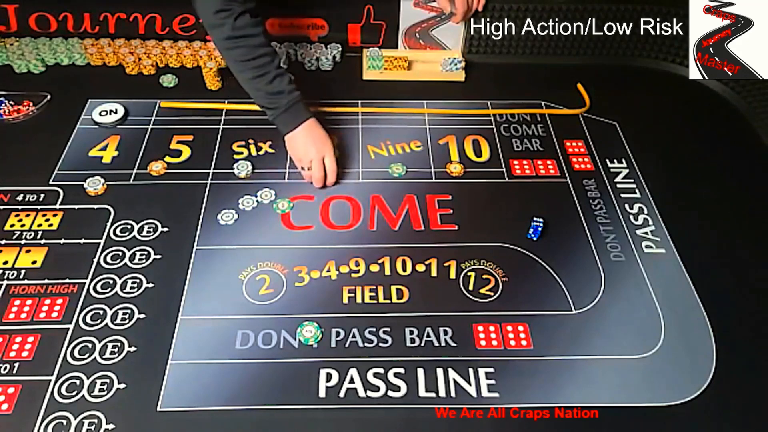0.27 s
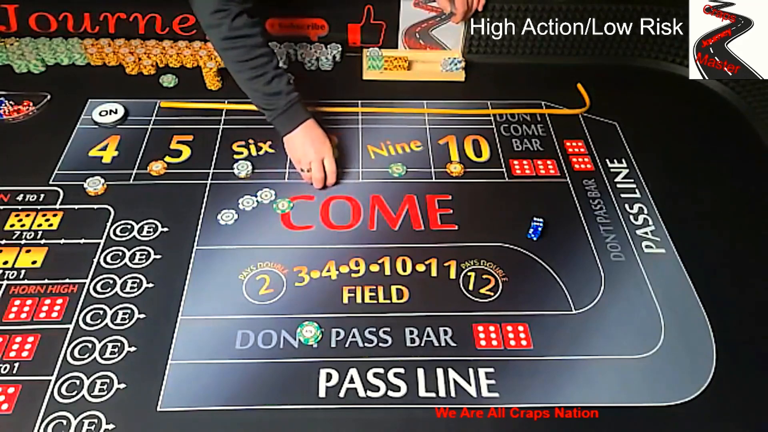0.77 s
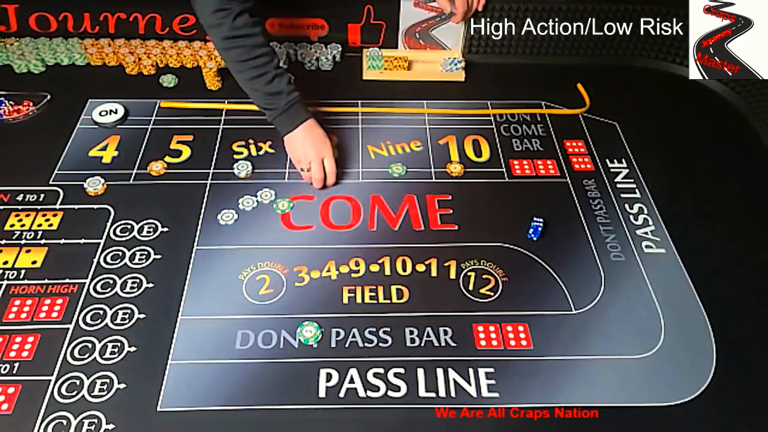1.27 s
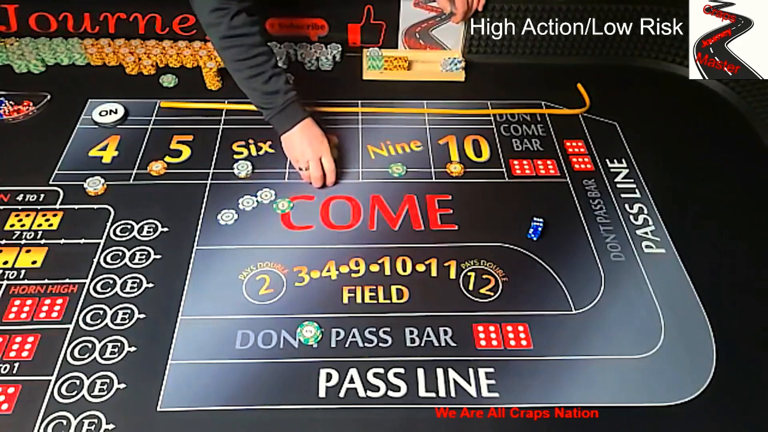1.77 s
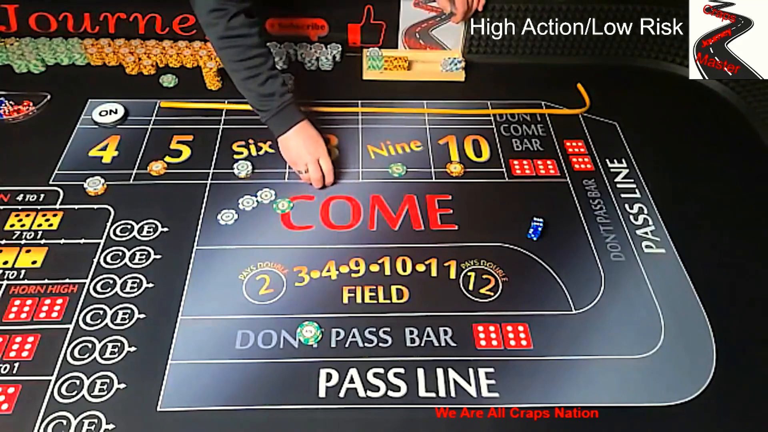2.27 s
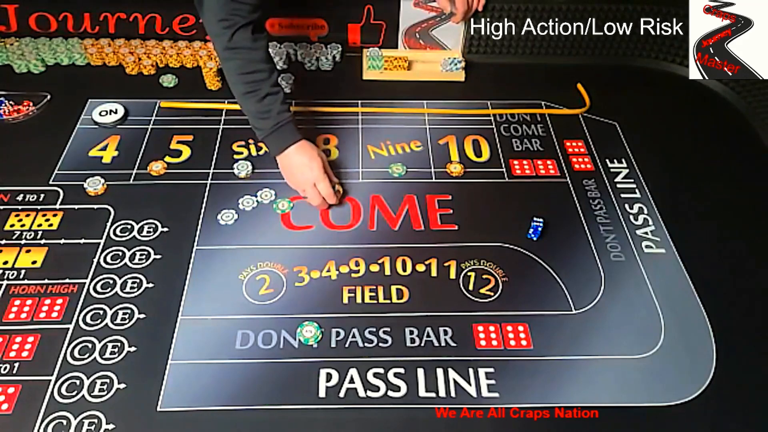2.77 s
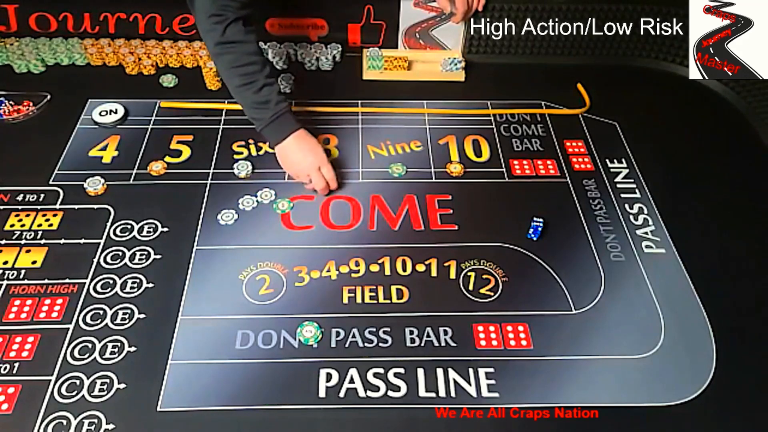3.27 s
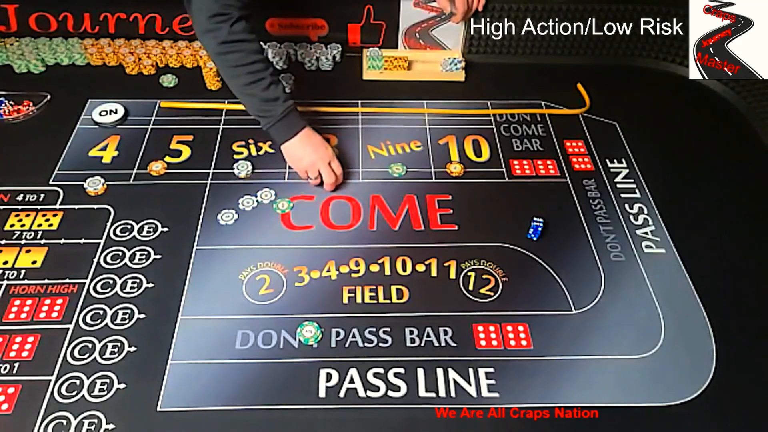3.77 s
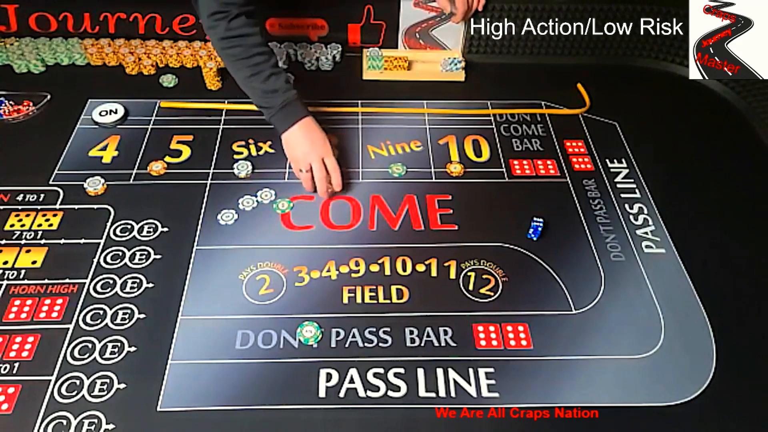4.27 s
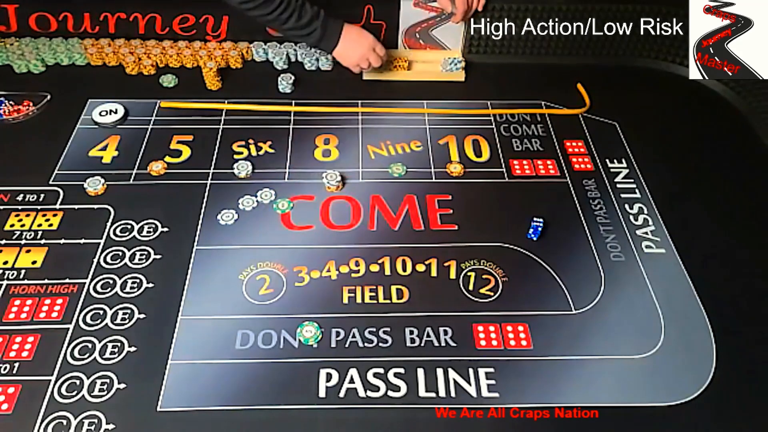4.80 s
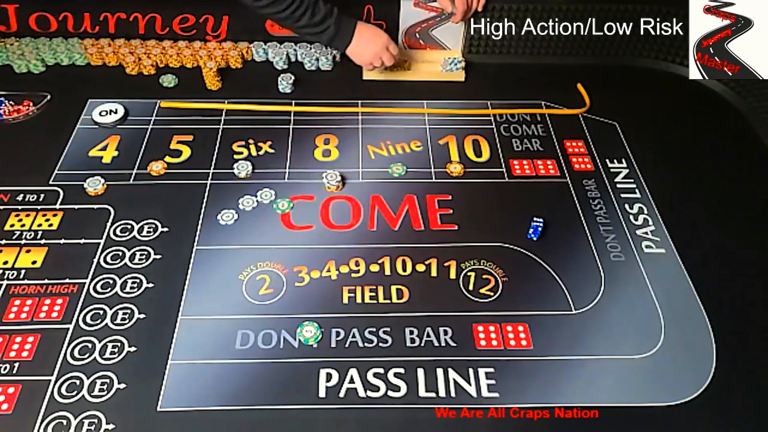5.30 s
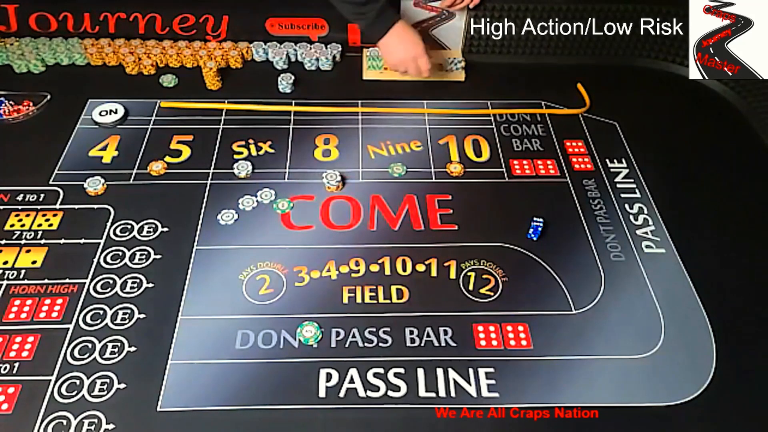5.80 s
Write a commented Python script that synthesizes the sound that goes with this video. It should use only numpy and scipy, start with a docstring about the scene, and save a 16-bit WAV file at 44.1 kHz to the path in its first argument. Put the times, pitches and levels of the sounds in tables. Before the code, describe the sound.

A clay casino chip click just catches the opening. A hand gives a soft, dull bump on a padded felt table, and a sleeve rustles faintly. Then chips clack together in one quick, bright cluster, the loudest sound, followed by a few much softer clicks and light scuffs on the felt. The microphone is close, in a small room, with only faint hiss and low hum in the gaps.

```python
"""A hand bumps a felt table and a sleeve rustles, then clay gaming chips click together, bright and close. (The
tail of an earlier click just catches the opening.) Each click is a short ring over a knock of the stack and
table; most rings are two chip faces meeting, but the lower one at 3.22 s is the knock of the stack ringing out.
The echo in the small room is held briefly and then cut short. Softer clicks and scuffs on the felt follow. In
between there is only hiss, a faint high whine and a low hum that comes up around the louder sounds."""
import sys
import numpy as np
from scipy import signal
from scipy.fft import rfft, irfft
from scipy.io import wavfile
from scipy.ndimage import uniform_filter1d

SR = 44100
rng = np.random.default_rng(int(sys.argv[2]) if len(sys.argv) > 2 else 0)


def generate_wav(sig):
    """Save sig (samples, or channels by samples) to the path in sys.argv[1] as 16-bit PCM at SR."""
    pcm = np.round(np.clip(np.atleast_2d(sig).T, -1, 1) * 32767).astype(np.int16)
    wavfile.write(sys.argv[1], SR, pcm)


N = 266584

# chip meets chip (the 3.22 s row's 2851 Hz ring is the stack and table's knock tone): start_s, ring_db,
# ring_pitch_hz, ring_length_s, knock_db, knock_tilt_db_per_oct, echo_db
CHIP_CLICKS = [(-.049, -10, 5730, 0.00096, -6, -1.5, 0.5), (3.2014, -0.2, 6310, 0.0026, -26, 6.5, -4),
               (3.2045, -0.5, 6290, 0.0029, -22.5, 2, -9), (3.207, -11, 6030, 0.0016, -22.5, -1.5, 4.5),
               (3.2087, -14, 6340, 0.0014, -17, 1, -1), (3.2113, -6, 6640, 0.0015, -20, 0, -7),
               (3.22, -15, 2851, 0.0026, -14, 2, -7.5), (3.229, -26, 6270, .002, -19, -1.5, 4.5),
               (3.253, -19, 6385, .004, -33, -2, -6), (4.014, -60, 2800, 0.0018, -62, 0, 2.5),
               (4.916, -52.5, 2497, 0.0018, -54, 0, 2.5), (5.4109, -29, 6040, 0.0013, -56, 9, -9.5),
               (5.415, -32, 5800, 0.0013, -62, 5, -7.5), (5.425, -43.5, 5800, .0013, -60, 4, -9),
               (5.5022, -42, 6520, 0.0011, -57, 6, 6.5), (5.5062, -42.5, 5870, 0.00074, -60, 0.5, 1.5),
               (5.931, -53.5, 6490, .0008, -61.5, 2, 12)]
# resonances of the stack and table under a click: pitch_hz, gain_db, t60_s
KNOCK_MODES = [(129, -36, .06), (250, -30.5, .04), (440, -28, .03), (952, -13.5, 0.018), (1451, -8, 0.015),
               (1990, -5, .005), (2838, 1, 0.0059), (3620, -4.5, .004), (4127, -5.5, 0.01),
               (4970, -4, 0.0069), (8000, -7.5, 0.0049), (8800, -11.5, .002), (9760, -7, 0.0051),
               (10600, -11, .002), (11400, -11.5, 0.0051), (12970, -12, .002), (14776, -17.5, .002)]
# dull bumps on the padded table, harder when shorter: start_s, level_db, push_length_s
HAND_BUMPS = [(1.3228, -40, 0.00071), (1.339, -50, 0.0022), (1.3703, -31.5, 0.00086),
              (1.3735, -31.5, 0.0013), (1.396, -60, 0.0016)]
# resonances of the table top: pitch_hz, gain_db, t60_s
TABLE_MODES = [(55.4, -13, 0.069), (288, 3, .033), (525, -17, .015), (820, -7, 0.022), (1100, -7, 0.013),
               (1880, -18, .01)]
# chips and fingers brushing the felt: start_s, length_s, level_db, tilt_db_per_oct
FELT_SCUFFS = [(1.319, 0.016, -54.5, -5.5), (1.332, .03, -65, 3.5), (1.359, .011, -49, -4.5),
               (1.362, 0.013, -60, 9), (1.387, 0.023, -66, -3), (4.006, 0.023, -66, -1),
               (4.911, 0.019, -62, 0), (4.933, .025, -69, 2), (5.399, .015, -57, 7), (5.43, .07, -69.5, 2),
               (5.508, 0.048, -71, -1)]
# tone colour of rubbed felt: frequency_hz, density_db
FELT_SPECTRUM = [(120, -51), (200, -6.5), (314, 2.5), (412, -12.5), (775, -4.5), (2090, -4), (2290, -4.5),
                 (3410, -16), (6420, -5.5), (15000, -26)]
# tugs of the sleeve: start_s, length_s, level_db
SLEEVE_TUGS = [(1.44, .04, -75), (1.515, .17, -69.5), (1.735, .022, -67), (1.86, .02, -66.5),
               (1.97, .08, -72), (2.1, .25, -79)]
# tone colour of the cloth: frequency_hz, density_db
CLOTH_SPECTRUM = [(180, -20), (300, -1.5), (660, -17.5), (816, 0.5), (962, -16), (1860, -9), (5000, -34),
                  (6500, -50), (11000, -120)]
# tone colour of the hiss: frequency_hz, density_db
HISS_SPECTRUM = [(20, -30), (45, -13), (60, -8), (90, -18.5), (125, -12.5), (170, -15), (290, -14.5),
                 (450, -18.5), (800, -20.5), (1500, -25), (2800, -26.5), (3500, -32.5), (6300, -27.5),
                 (8000, -32.5), (12000, -28.5), (15800, -30)]
# slow drift of the hiss: time_s, low_band_db, high_band_db
HISS_DRIFT = [(0.0, -77.5, -80), (0.4, -73.5, -76), (1.1, -77, -76.5), (1.6, -74, -78.5),
              (2.35, -76, -78.5), (2.64, -80, -80.5), (3.23, -77.5, -77), (3.38, -70.5, -76.5),
              (3.65, -76, -78.5), (5.3, -76.5, -77.5), (5.62, -72.5, -77), (6.04, -76, -78.5)]
# fader curve of the hum: time_s, gain_db
HUM_FADER = [(0.0, -72), (0.54, -67), (1.24, -67), (1.33, -72), (2.07, -77), (2.39, -73), (2.81, -74),
             (3.41, -68), (3.55, -71), (4.34, -73), (4.64, -71), (5.11, -74), (5.63, -73), (6.04, -74)]
# partials of the hum: pitch_hz, gain_db, width_hz
HUM_PARTIALS = [(57.2, 0.5, 2.2), (120, -9.5, 6.9), (187, -15.5, 8), (255, -14, 10), (316, -12.5, 6.1)]

PREROLL = 4410  # samples, so a click can fall before the start


def chips(room_t60=.52, knock_echo_t60=.26, cut_db_s=520, knock_cut_db=24, build_s=.0015, contact_s=.00028):
    """Two clay faces close and part: a ring swells and shrinks over a knock, and the room answers."""
    hold_s, hold_s_per_db, min_hold_s = .066, .0021, .004
    linger_db, linger_t60, narrow_t60 = -38, .42, .006  # a faint, narrower ring outlasts the cut
    out, t, tail_t = np.zeros(N + PREROLL), np.arange(1500) / SR, np.arange(SR // 2) / SR
    starts, rings_db = np.transpose(CHIP_CLICKS)[:2]
    # a louder ring keeps the echo open longer, also for the clicks that follow it
    cut_times = np.maximum.accumulate(starts + np.maximum(hold_s + hold_s_per_db * rings_db, min_hold_s))
    for click, held_s in zip(CHIP_CLICKS, cut_times - starts):
        start, ring_db, hz, length, knock_db, tilt, echo_db = click
        swell = np.sin(np.pi * np.clip(t / length, 0, 1) ** .7) ** 2
        ring = amp(ring_db) * swell * np.sin(2 * np.pi * hz * t)
        modes = [(f, db + tilt * np.log2(f / 3000), t60) for f, db, t60 in KNOCK_MODES]
        knock = amp(knock_db) * resonate(modes, t) * (1 - np.exp(-t / contact_s))
        narrow = signal.fftconvolve(ring, resonate([(hz, 0, narrow_t60)], t))
        narrow *= np.linalg.norm(ring) / np.linalg.norm(narrow)
        add(out, start, ring + knock)
        build = (1 - np.exp(-tail_t / build_s)) * amp(echo_db) / np.sqrt(SR * .018)
        cut_db = cut_db_s * np.maximum(tail_t - held_s, 0)
        for sound, decay_db in [(ring, -cut_db - 60 * tail_t / room_t60),
                                (knock, -np.minimum(cut_db, knock_cut_db) - 60 * tail_t / knock_echo_t60),
                                (narrow, linger_db - 60 * (tail_t - held_s) / linger_t60)]:
            reflections = rng.standard_normal(len(tail_t)) * build * amp(decay_db)
            add(out, start, signal.fftconvolve(sound, reflections))
    return out[PREROLL:]


def table_bumps(ring_db=-5):
    """The hand's rounded push pulls the pressure down, then the table top rings low."""
    out, t = np.zeros(N + PREROLL), np.arange(4000) / SR
    for start, db, length in HAND_BUMPS:
        push = np.sin(np.pi * np.clip(t / length, 0, 1)) ** 2
        ring = signal.fftconvolve(push / push.sum(), resonate(TABLE_MODES, t))[:len(t)]
        add(out, start, -amp(db) * (push + amp(ring_db) * ring))
    return out[PREROLL:]


def felt_scuffs(grain_db=2.8, attack_s=.0025, release_db_s=770, size=4096):
    """Short strokes over felt: friction noise, made grainy by the uneven grip."""
    out, t, hz = np.zeros(N + PREROLL), np.arange(size) / SR, np.fft.rfftfreq(size, 1 / SR)
    for start, length, db, tilt in FELT_SCUFFS:
        colour = amp(spectrum_db(FELT_SPECTRUM, hz) + tilt * np.log2((hz + 50) / 2000))
        rub = unit_rms(irfft(rfft(rng.standard_normal(size)) * colour))
        grip = amp(grain_db * flutter(size, 60))
        stroke = np.clip(t / attack_s, 0, 1) * amp(-np.maximum(t - length, 0) * release_db_s)
        add(out, start, amp(db) * rub * grip * stroke)
    return out[PREROLL:]


def sleeve(attack_db_s=700, release_db_s=300):
    """Cloth drags in small starts and stops: each tug rises fast, holds and fades."""
    def level_db(hz, t):
        tugs_db = [db - attack_db_s * np.maximum(start - t, 0)
                   - release_db_s * np.maximum(t - start - length, 0) for start, length, db in SLEEVE_TUGS]
        cloth_db = spectrum_db(CLOTH_SPECTRUM, hz) + band_trim_db(CLOTH_SPECTRUM, 600, 2600)
        return cloth_db + np.max(tugs_db, axis=0)
    return textured_noise(level_db, patch_db=2.5, streak_db=2.5)


def hiss(flicker_db=.9, size=1024):
    """A bed of room and microphone noise; it flickers, and its lows and highs drift apart."""
    times, low_db, high_db = np.transpose(HISS_DRIFT)
    low_db = low_db + band_trim_db(HISS_SPECTRUM, 300, 2000, size)
    high_db = high_db + band_trim_db(HISS_SPECTRUM, 7500, 15000, size)

    def level_db(hz, t):
        treble = np.clip(np.log2((hz + 1) / 1200) / 1.9, 0, 1)  # crossfade from low band to high
        drift_db = (1 - treble) * np.interp(t, times, low_db) + treble * np.interp(t, times, high_db)
        return spectrum_db(HISS_SPECTRUM, hz) + drift_db + flicker_db * flutter(len(t), 6)
    return textured_noise(level_db, patch_db=1.1, streak_db=2.5, size=size)


def hum(steady=.78, waver_db=1.1):
    """A low, wavering hum; each partial is a steady tone with a fuzz of narrow noise around it."""
    t, out = np.arange(N) / SR, 0
    for hz, db, width_hz in HUM_PARTIALS:
        lowpass = [1], [1, -np.exp(-np.pi * width_hz / SR)]
        fuzz = signal.lfilter(*lowpass, signal.lfilter(*lowpass, rng.standard_normal((2, N))))
        envelope = steady + (1 - steady) * (unit_rms(fuzz[0]) + 1j * unit_rms(fuzz[1]))
        out = out + amp(db) * unit_rms((envelope * np.exp(2j * np.pi * hz * t)).real)
    waver = unit_rms(uniform_filter1d(flutter(N, 3000), 3000))
    return out * amp(np.interp(t, *np.transpose(HUM_FADER)) + waver_db * waver)


def hum_lift(foreground, threshold_db=-65, ramp_db=8, lift_db=12, window_s=.034):
    """Side-chain gain that lets the hum up while the foreground is loud in the mids."""
    mids = signal.sosfilt(signal.butter(2, [300, 2000], "band", fs=SR, output="sos"), foreground)
    mids_db = 10 * np.log10(abs(uniform_filter1d(mids ** 2, round(window_s * SR))) + 1e-12)
    return amp(lift_db * np.clip((mids_db - threshold_db) / ramp_db, 0, 1))


def whine(pitch_hz=12021, level_db=-90.5):
    """One thin high tone whose phase wanders a little."""
    wander = 2.5 * np.cumsum(rng.standard_normal(N)) / np.sqrt(SR)
    return amp(level_db) * np.sqrt(2) * np.sin(2 * np.pi * pitch_hz * np.arange(N) / SR + wander)


def resonate(modes, t):
    """A struck body's dying sines; neighbours start in opposite directions to fill the gaps between."""
    return sum((-1) ** k * amp(db - 60 * t / t60) * np.sin(2 * np.pi * hz * t)
               for k, (hz, db, t60) in enumerate(modes))


def textured_noise(level_db, patch_db, streak_db, size=512):
    """Noise shaped by level_db(hz, t), roughened with small patches and thin lingering streaks."""
    frames, hz = N // (size // 4) + 5, np.fft.rfftfreq(size, 1 / SR)[:, None]
    t = np.arange(frames) * size / 4 / SR
    real, imag, patches, streaks = rng.standard_normal((frames, size // 2 + 1, 4)).T
    patches = unit_rms(uniform_filter1d(uniform_filter1d(patches, 5, axis=0), 10, axis=1))
    streaks = unit_rms(uniform_filter1d(uniform_filter1d(streaks, 2, axis=0), 70, axis=1))
    gain = amp(level_db(hz, t) + patch_db * patches + streak_db * streaks)
    return signal.istft((real + 1j * imag) * gain, nperseg=size, noverlap=3 * size // 4)[1][:N]


def band_trim_db(points, low_hz, high_hz, size=512):
    """Trim that brings the summed power of a spectrum's bins in one band to 0 dB."""
    hz = np.fft.rfftfreq(size, 1 / SR)
    band = amp(spectrum_db(points, hz[(hz > low_hz) & (hz < high_hz)]))
    return -10 * np.log10(np.sum(band ** 2))


def spectrum_db(points, hz):
    """An EQ curve through the points, on a log frequency axis."""
    point_hz, point_db = np.transpose(points)
    return np.interp(np.log(hz + 1), np.log(point_hz + 1), point_db)


def flutter(count, smoothing):
    return unit_rms(uniform_filter1d(rng.standard_normal(count), smoothing))


def amp(db):
    return 10 ** (np.asarray(db) / 20)


def unit_rms(x):
    return x / np.sqrt(np.mean(x ** 2) + 1e-30)


def add(mix, start_s, sound):
    part = mix[PREROLL + round(start_s * SR):][:len(sound)]
    part += sound[:len(part)]


def scene():
    """Mono mix: the action on the table in front, sleeve and room tone behind."""
    foreground = chips() + table_bumps() + felt_scuffs()
    return (foreground + sleeve() + hiss() + hum() * hum_lift(foreground) + whine())[None]


def record(dry, low_cut_hz=31, ceiling=.97, high_cut_hz=15800):
    """The microphone drops the deepest bass; peaks are soft-clipped and the very top is cut off."""
    lean = signal.sosfilt(signal.butter(2, low_cut_hz, "high", fs=SR, output="sos"), dry)
    clipped = lean / (1 + abs(lean / ceiling) ** 8) ** (1 / 8)
    high_cut = signal.firwin(1023, high_cut_hz, window=("kaiser", 9), fs=SR)
    return signal.oaconvolve(clipped, high_cut[None], "same")


dry = scene()
out = record(dry)
generate_wav(out)
```